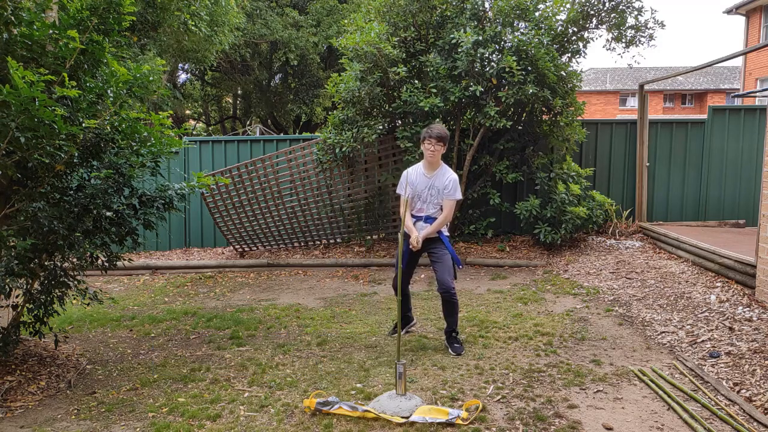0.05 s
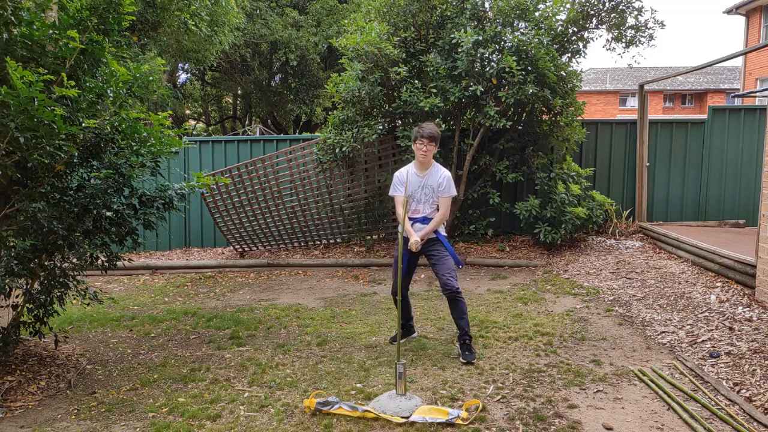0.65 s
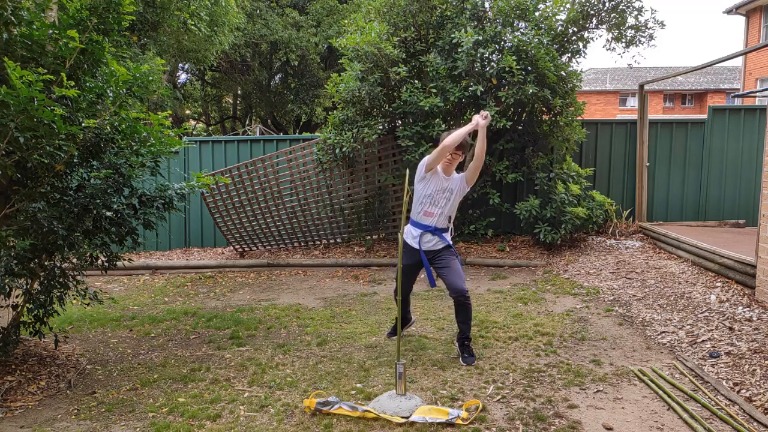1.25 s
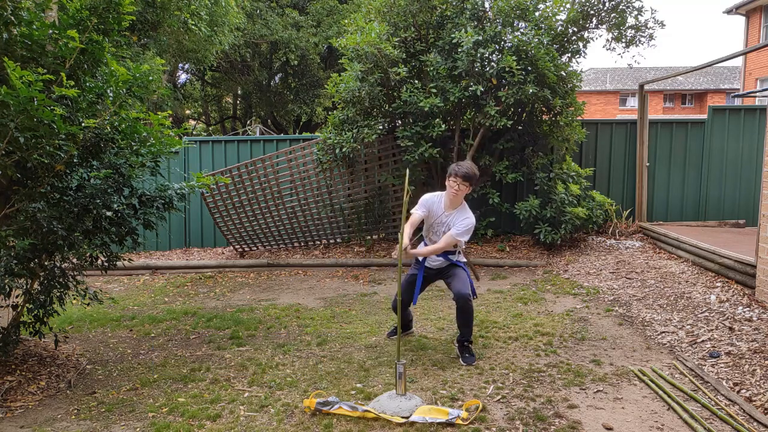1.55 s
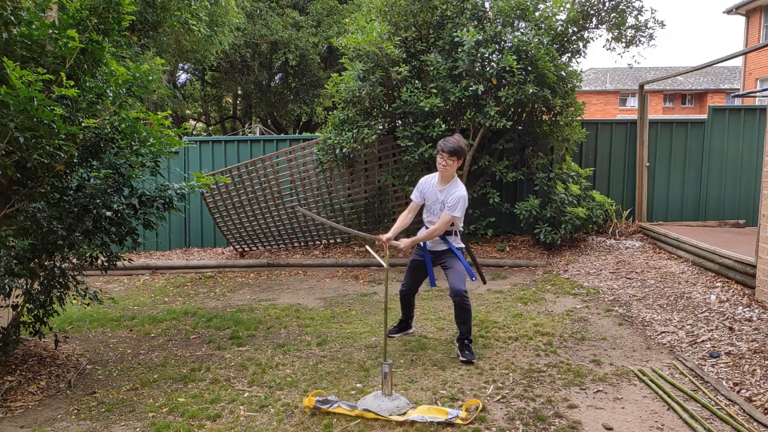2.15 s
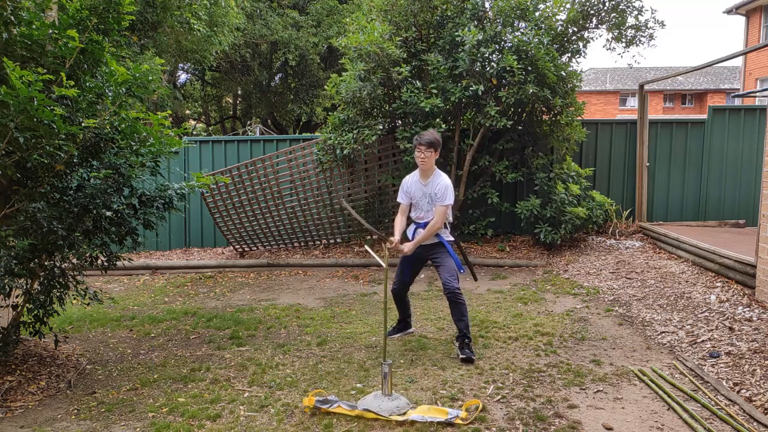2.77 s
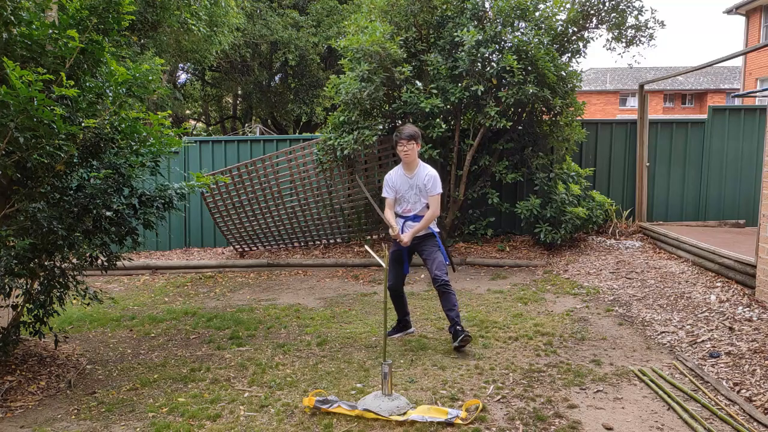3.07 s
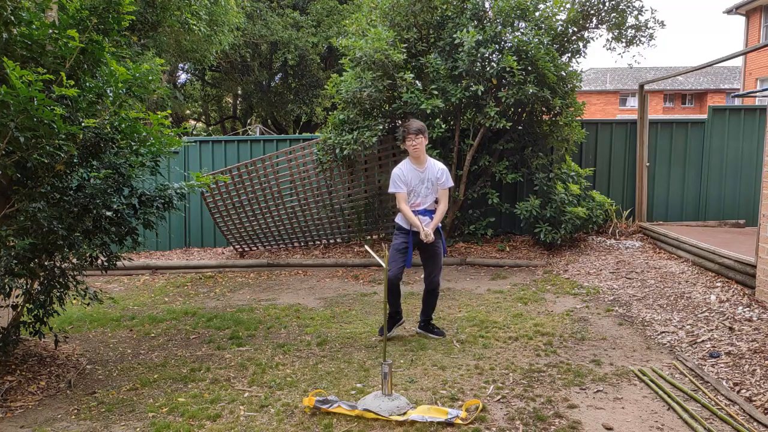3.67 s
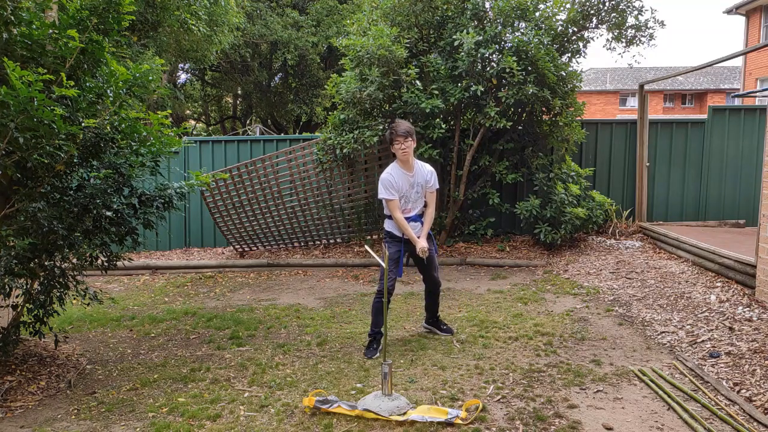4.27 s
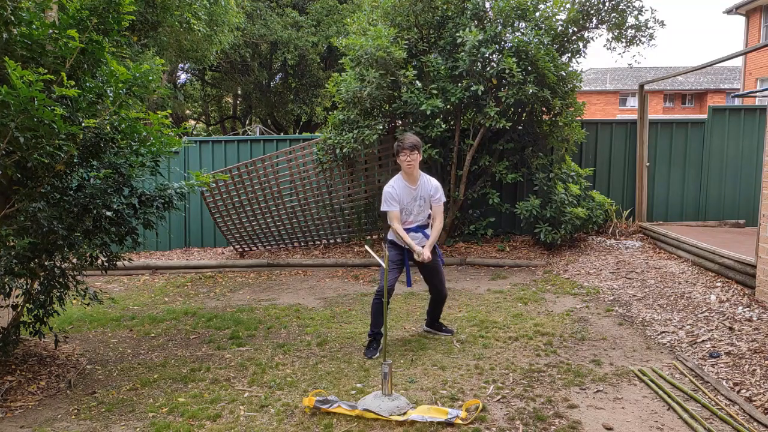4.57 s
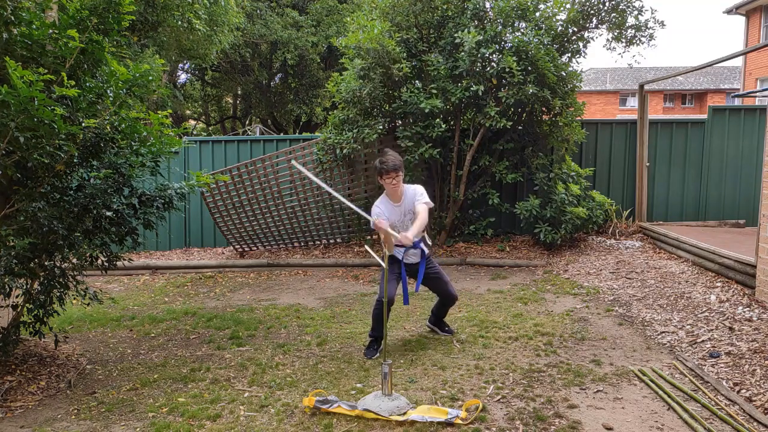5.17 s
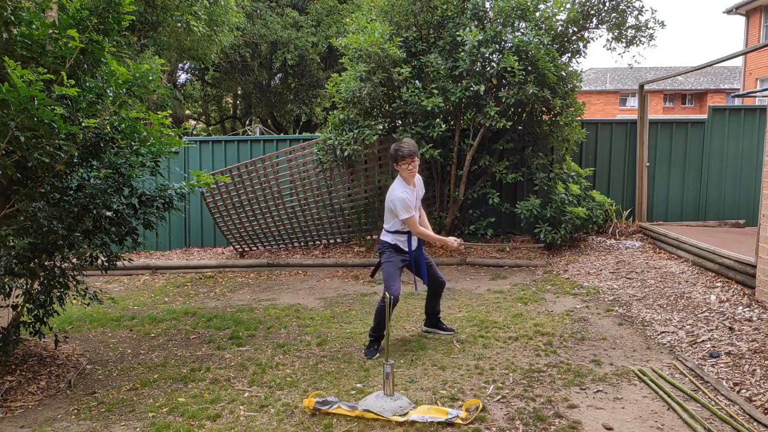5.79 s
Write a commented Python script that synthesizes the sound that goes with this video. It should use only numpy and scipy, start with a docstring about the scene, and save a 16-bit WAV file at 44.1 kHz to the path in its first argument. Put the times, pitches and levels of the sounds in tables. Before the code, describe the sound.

Close to the microphone in a fenced back yard, a sword gives a very brief whistle and bursts through a dry bamboo pole with a loud, splintering crack. The cut piece clatters down hollowly as the stand thuds softly on turf. A few seconds later comes a second cut and clatter, with splinters skittering through dead leaves. A small bird repeats a thin, high call over leaf hiss and distant town rumble.

```python
"""A fenced back yard, in stereo. Near the microphone a sword cuts twice through a dry bamboo pole:
the blade whistles, the fibres burst with a crack that overloads the recorder, and each cut piece
clatters down as a hollow tube while the stand rocks on the turf. Walls and fence answer. In the trees
a small bird repeats a thin high call and a farther one chirps once, over leaf hiss, soft swells of
air and the rumble of a distant town."""
import sys
import numpy as np
from scipy import signal
from scipy.fft import rfft, irfft, next_fast_len
from scipy.io import wavfile
from scipy.ndimage import uniform_filter1d, map_coordinates

SR = 44100
rng = np.random.default_rng(int(sys.argv[2]) if len(sys.argv) > 2 else 0)


def inscribe(sig):
    """Save sig as 16-bit PCM at rate SR to the path in sys.argv[1].

    A 1-D sig is mono; a 2-D sig holds one channel per row.
    Samples are clipped to [-1, 1] before scaling.
    """
    pcm = np.round(np.clip(np.atleast_2d(sig).T, -1, 1) * 32767)
    wavfile.write(sys.argv[1], SR, pcm.astype(np.int16))


N = 266135
TIME = np.arange(N) / SR
AGE = TIME[:SR * 3 // 4]  # seconds since the start of one short event


# The pole breaking, near the microphone: start_s, crack_db, tear_db, tear_s, jolt_db
BREAKS = [(1.6419, 0, -9.5, 0.02, -27), (1.674, -7, -24, 0.004, -28.5), (1.6824, -6, -14.5, 0.0035, -27.5),
          (5.3157, -2, -12, .023, -22)]
# Spectrum of the bursting fibres: frequency_hz, level_db
FIBRE_SPECTRUM = [(60, -23), (150, -30), (280, -15), (500, -3), (850, -11.5), (1300, -8.5), (2000, -4),
                  (3400, -2), (4600, -1), (6500, -4.5), (8500, 2), (10300, -9.5), (13000, -10.5),
                  (15500, -6)]

def cuts():
    """The edge cracks the hard skin, then fibres snap in a dense run while the pole is jolted."""
    crack_decay_s, splinter_decay_s, jolt_decay_s = 0.0047, 0.066, 0.024
    pole_spectrum = [(50, -1.5), (140, 1), (260, -3), (500, -8.5), (1000, -4), (4000, -62)]
    out = np.zeros((2, N))
    for start, crack_db, tear_db, tear_s, jolt_db in BREAKS:
        crack = amp(crack_db) * snaps(per_s=15000, spread_db=5.5) * np.exp(-AGE / crack_decay_s)
        run = np.exp(-(AGE / tear_s) ** 3)
        last_fibres = amp(-18.5) * np.exp(-AGE / splinter_decay_s)
        tear = amp(tear_db) * snaps(per_s=2500, spread_db=3.5) * (run + last_fibres)
        jolt = amp(jolt_db - 3) * rng.standard_normal(len(AGE)) * np.exp(-AGE / jolt_decay_s)
        add(out, start, yard(coloured(crack + tear, FIBRE_SPECTRUM), wet_db=1.5))
        add(out, start, yard(coloured(jolt, pole_spectrum), wet_db=-5.5))
    return out


# A twig underfoot, the cane giving way, a piece settling: start_s, level_db, pitch_hz, t60_s
WOODY_TICKS = [(.822, -37, 3000, .006), (1.679, -14.5, 1300, 0.014), (2.179, -36.5, 1800, .008),
               (5.3212, -9.5, 1150, 0.0054)]

def woody_ticks():
    """Short dry ticks and knocks: wood rings and stops within a few cycles."""
    out = np.zeros((2, N))
    for start, db, hz, t60 in WOODY_TICKS:
        add(out, start, yard(2 * damped_sine(hz, db, t60), wet_db=-6))
    return out


# The blade whistling just ahead of each cut: start_s, end_s, start_hz, end_hz, level_db
BLADE_SWINGS = [(1.598, 1.644, 1002, 1170, -38), (5.284, 5.318, 1240, 1063, -34)]

def blade():
    """Eddies shed by the blade give a short whistle that frays and swells as the blade speeds up."""
    attack_s, release_s = 0.0039, 0.005
    out = np.zeros((2, N))
    for start, end, start_hz, end_hz, db in BLADE_SWINGS:
        length = end - start
        progress = np.clip(AGE / length, 0, 1)
        fray = (0.03 + 0.17 * progress) * wobble(600)[:len(AGE)]
        pitch = (start_hz + (end_hz - start_hz) * progress) * (1 + fray)
        phase = 2 * np.pi * np.cumsum(pitch) / SR
        whistle = np.sin(phase) + amp(-15) * np.sin(2 * phase)
        swell = np.interp(AGE, [0, attack_s, length, length + release_s], [0, 1, 1.46, 0])
        add(out, start, yard(amp(db) * swell * whistle, wet_db=-12))
    return out


# Each falling piece's hits and their quick echoes off the walls: start_s, level_db, rattle_s
PIECE_CLATTER = [
    [(1.834, -15, 0.00099), (1.8356, -1.5, 0.0018), (1.8455, -8.5, 0.0015), (1.8525, -8, .0015)],
    [(5.4358, -16, 0.017), (5.446, -5.5, 0.0058), (5.4655, -12.5, 0.0049)],
]
# Resonances of each hollow piece: pitch_hz, level_db, t60_s
TUBE_MODES = [
    [(314, -14.5, 0.058), (2280, -6, 0.015), (2590, -1, 0.018), (3050, -8, .03), (3240, -0.5, .035),
     (3370, 3, 0.022)],
    [(818, 5, 0.023), (1170, -2, 0.059), (1520, -7, 0.032), (2300, -4, .035), (3140, -2, .04),
     (3580, -18, 0.026), (4000, -5, .03)],
]
# Spectrum of each piece's clatter: frequency_hz, level_db
CLATTER_SPECTRA = [
    [(100, -9.5), (450, -13), (850, -11), (1700, -3), (2400, -0.5), (3100, 1), (4400, -5.5), (7500, -3.5),
     (9000, -3.5), (10500, -11.5), (15500, -8.5)],
    [(100, -19), (300, -10.5), (540, -16.5), (850, -2.5), (2000, -1), (3400, 0), (4800, -0.5), (5800, -10),
     (9000, -2), (10500, -13.5), (15500, -13)],
]

def falling_pieces():
    """Each hit or echo in the clatter is a dry click and a brief rattle, with the ring of the tube."""
    click_db, rattle_db, ring_db = 16, -2, -14.5
    out = np.zeros((2, N))
    for clatter, modes, spectrum in zip(PIECE_CLATTER, TUBE_MODES, CLATTER_SPECTRA):
        for start, db, rattle_s in clatter:
            burst = amp(rattle_db) * snaps(per_s=12000, spread_db=5) * np.exp(-AGE / rattle_s)
            burst[0] = amp(click_db)
            # neighbouring modes move the tube's end in opposite directions
            ring = sum((-1) ** k * damped_sine(hz, mode_db + rng.normal(0, 1), t60)
                       for k, (hz, mode_db, t60) in enumerate(modes))
            clack = coloured(burst, spectrum) + amp(ring_db) * ring
            add(out, start, yard(amp(db) * clack, wet_db=-0.5))
    return out


# Splinters skittering on the ground after the second cut: start_s, level_db, decay_s
SPLINTER_SKITTERS = [(5.392, -22, 0.044), (5.695, -30.5, 0.024), (5.846, -39, 0.0051)]
# Spectrum of the dry leaf litter: frequency_hz, level_db
LITTER_SPECTRUM = [(300, -20), (1500, -9), (5000, -8), (8600, 1.5), (10500, -7), (15500, -5.5)]

def splinters():
    """Light splinters and twigs scratch through dead leaves."""
    out = np.zeros((2, N))
    for start, db, decay_s in SPLINTER_SKITTERS:
        scratch = snaps(per_s=3100, spread_db=8) * np.exp(-AGE / decay_s)
        add(out, start, yard(amp(db) * coloured(scratch, LITTER_SPECTRUM), wet_db=3))
    return out


# The weighted stand rocking, dead centre and without echo: start_s, level_db, pitch_hz
STAND_THUDS = [(1.665, -28, 143), (1.72, -30, 121), (1.895, -27.5, 112), (5.355, -24, 103)]

def stand():
    """The heavy foot drops back and sinks into soft turf."""
    attack_s = 0.0081
    sink = 1 - np.exp(-AGE / attack_s)
    out = np.zeros(N)
    for start, db, hz in STAND_THUDS:
        add(out, start, 2 * sink * damped_sine(hz, db, t60_s=0.13))
    return out


# A small bird off in the trees: start_s, length_s, middle_hz, glide_hz, level_db
BIRD_CALLS = [(-.1, 0.59, 9120, -170, -40), (1.13, 0.55, 8720, 403, -40.5),
              (2.22, 0.39, 8750, 218.5, -42.5), (3.238, 0.51, 8510, -1.5, -48),
              (4.222, .42, 8600, -190, -51), (5.221, 0.4, 8840, -490, -42.5)]

def birds():
    """Thin gliding whistles, each opened by a higher note, and one farther chirp; foliage scatters both."""
    waver_hz, fray_hz, bow_hz, flutter_db = 34.6, 78, 60.7, 2
    lead_s, lead_ratio, lead_db = 0.061, 1.17, -12
    foliage_db, foliage_t60_s = 4, 0.28
    unsteady_hz = waver_hz * wobble(25) + fray_hz * wobble(400)
    phase = lambda hz: 2 * np.pi * np.cumsum(hz + unsteady_hz) / SR
    song = np.zeros(N)
    for start, length, hz, glide_hz, db in BIRD_CALLS:
        bow = arch(start, length)  # pitch and level both bow upward mid-call
        progress = np.clip((TIME - start) / length, 0, 1)
        pitch = hz + glide_hz * (progress - 0.5) + bow_hz * (bow - 0.5)
        lead = amp(lead_db) * arch(start - lead_s / 2, lead_s) * np.sin(phase(lead_ratio * hz))
        song += amp(db) * (np.sqrt(bow) * np.sin(phase(pitch)) + lead)
    chirp_phase = phase(hz=2990)
    chirp = 0.5 * np.sin(chirp_phase) + np.sin(2 * chirp_phase)
    song += amp(-48.5) * arch(start_s=2.725, length_s=0.11) * chirp
    song *= amp(flutter_db * wobble(30.1))
    foliage = rng.standard_normal((2, len(AGE))) * amp(-60 * AGE / foliage_t60_s)
    foliage /= np.linalg.norm(foliage[0])
    return song + amp(foliage_db) * signal.fftconvolve(song[None], foliage, axes=1)[:, :N]


# The town, far beyond the fence: frequency_hz, level_db
TOWN_SPECTRUM = [(11, -29), (18, 1.5), (60, -1.5), (108, -10), (145, -3.5), (174, -11), (338, -12.5),
                 (532, -20.5), (577, -13.5), (627, -19), (2500, -31.5), (3250, -47), (5500, -120)]
# Traffic in the distance: frequency_hz, level_db
TRAFFIC_SPECTRUM = [(30, -17), (85, 2), (140, -13), (250, -4.5), (500, -18.5), (4000, -65)]

def town():
    """A steady distant rumble, over which far traffic swells once and recedes."""
    rumble = amp(-38.5) * rush(TOWN_SPECTRUM, patchy_db=0.74)
    traffic = amp(-39) * rush(TRAFFIC_SPECTRUM, patchy_db=1.5)
    return rumble + traffic * hump(peak_s=5.05, half_length_s=0.62)


# Leaf hiss all around the microphone: frequency_hz, level_db
LEAF_SPECTRUM = [(710, 2.5), (1200, -4.5), (2320, -3.5), (2890, -2), (3510, -2), (6100, -1), (7100, -2),
                 (8630, 1), (9210, 0), (10500, -13), (14800, -13.5), (16000, -20)]

def leaves():
    """The breeze in the leaves holds, then drops away to a calm."""
    breeze_db, calm_db, hold_s, release_s = -40, -43, 1.95, 0.69
    breeze = np.exp(-np.maximum(TIME - hold_s, 0) / release_s)
    return amp(calm_db + (breeze_db - calm_db) * breeze) * rush(LEAF_SPECTRUM, patchy_db=1)


# Deep air noise, the same in both channels: peak_s, half_length_s, level_db
AIR_SWELLS = [(2.97, 0.23, -35.5), (4.25, 0.29, -46), (5.604, 0.22, -36)]

def air():
    """A low band of air noise rises and falls in soft swells."""
    centre_hz = 34.5
    band = [(centre_hz / 4, -30), (centre_hz, 0), (centre_hz * 2, -20), (centre_hz * 20, -80)]
    noise = unit(filtered(rng.standard_normal(N), lambda hz: amp(along(band, hz))))
    return noise * sum(amp(db) * hump(peak, half_length) for peak, half_length, db in AIR_SWELLS)


# How alike town and leaves are on the microphone's two sides: frequency_hz, correlation
STEREO_LIKENESS = [(60, 0.82), (150, 0.94), (380, 0.81), (950, -0.12), (2380, -0.11), (5980, -0.00032),
                   (15000, 0.011)]

def rush(spectrum, patchy_db):
    """Diffuse stereo noise of rms 1, its level uneven in patches of time and frequency."""
    bins = signal.stft(rng.standard_normal((2, N)), nperseg=512)[2]
    patches = uniform_filter1d(rng.standard_normal(bins.shape[1:]), size=5, axis=0)
    patches = uniform_filter1d(patches, size=14, axis=1)
    pair = signal.istft(bins * amp(patchy_db * unit(patches)), nperseg=512)[1][:, :N]
    width = lambda hz: np.arccos(np.clip(along(STEREO_LIKENESS, hz), -1, 1)) / 2
    response = lambda hz: amp(along(spectrum, hz)) * [np.cos(width(hz)), np.sin(width(hz))]
    mid, side = filtered(pair, response)
    return unit(np.array([mid + side, mid - side]))


# Echoes of the nearest walls at the microphone: delay_s, level_db, left_lag_s
WALL_ECHOES = [(0.0098, -10.5, -0.0043), (0.017, -4, .0003), (.0227, -9, -.0003)]
# Reverberation of the yard: frequency_hz, t60_s
YARD_DECAY = [(150, 0.39), (900, 0.36), (3000, .48), (8000, 0.41), (15000, 0.28)]

def yard(x, wet_db):
    """Direct sound, scatter off the ground, then wall echoes and the dying wash of fence and trees."""
    ground_db, ground_decay_s = -9, 0.00075
    gap_s, early_db, early_t60_s = 0.0098, 3, 0.16
    hz, t, bins = signal.stft(rng.standard_normal((2, len(AGE))), SR, nperseg=256)
    fade = amp(-60 * t / along(YARD_DECAY, hz)[:, None]) + amp(early_db - 60 * t / early_t60_s)
    wash = signal.istft(bins * fade, SR, nperseg=256)[1][:, :len(AGE)] * (AGE > gap_s)
    ground = rng.standard_normal(wash.shape) * np.exp(-AGE / ground_decay_s)
    response = amp(wet_db) * wash / np.linalg.norm(wash[0])
    response += amp(ground_db) * ground / np.linalg.norm(ground[0])
    response[:, 0] += 1  # direct sound
    for delay, db, left_lag in WALL_ECHOES:
        response[0, round((delay + left_lag) * SR)] += amp(db)
        response[1, round(delay * SR)] += amp(db)
    return signal.fftconvolve(x[None], response, axes=1)[:, :len(AGE)]


def snaps(per_s, spread_db):
    """Tiny fractures at random moments and of random sizes, rms 1."""
    sizes = amp(spread_db * np.clip(rng.standard_normal(len(AGE)), -2, 2))
    signs = rng.choice([-1, 1], len(AGE))
    return unit(sizes * signs * (rng.random(len(AGE)) < per_s / SR))


def damped_sine(hz, db, t60_s):
    """One struck resonance dying away."""
    return amp(db - 60 * AGE / t60_s) * np.sin(2 * np.pi * hz * AGE)


def arch(start_s, length_s):
    """Half a sine over a note, zero outside it."""
    return np.abs(np.sin(np.pi * np.clip((TIME - start_s) / length_s, 0, 1)))


def hump(peak_s, half_length_s):
    """A bell-shaped rise and fall."""
    return np.exp(-((TIME - peak_s) / half_length_s) ** 2)


def wobble(per_s):
    """A smooth random curve with per_s knots a second."""
    return map_coordinates(rng.standard_normal(int(N * per_s / SR) + 4), [TIME * per_s])


def amp(db):
    """Decibels to gain."""
    return 10 ** (np.asarray(db) / 20)


def unit(x):
    """Scale to rms 1."""
    return x / np.sqrt(np.mean(x ** 2) + 1e-20)


def along(points, hz):
    """Read (frequency_hz, value) points on a log frequency axis."""
    frequencies, values = np.transpose(points)
    return np.interp(np.log(hz + 1), np.log(frequencies + 1), values)


def filtered(x, response):
    """x through a zero-phase filter of gain response(hz)."""
    size = next_fast_len(N + SR // 2)
    return irfft(rfft(x, size) * response(np.fft.rfftfreq(size, 1 / SR)), size)[..., :N]


def coloured(x, spectrum, size=2048):
    """x through a causal filter of energy 1, shaped by (frequency_hz, level_db) points."""
    gain = amp(along(spectrum, np.fft.rfftfreq(size, 1 / SR)))
    cepstrum = irfft(np.log(gain))
    cepstrum[1:size // 2] *= 2  # fold onto positive time for minimum phase
    cepstrum[size // 2 + 1:] = 0
    pulse = irfft(np.exp(rfft(cepstrum)))
    return signal.fftconvolve(x, pulse / np.linalg.norm(pulse))[:len(x)]


def add(track, start_s, x):
    """Mix x into the track from start_s."""
    part = track[..., round(start_s * SR):][..., :x.shape[-1]]
    part += x[..., :part.shape[-1]]


def scene():
    """Everything that reaches the microphone, from the pole out to the distance."""
    near = cuts() + woody_ticks() + blade() + falling_pieces() + splinters() + stand()
    return near + birds() + town() + leaves() + air()


def record(dry):
    """The microphone's left side is the brighter; the cracks overload the band-limited recorder."""
    top_hz = 16000
    tilt_db = lambda hz: along([(9000, 0), (11000, 2.5), (15000, 2)], hz)
    band = lambda hz: np.interp(hz, [top_hz - 150, top_hz + 150], [1, 0])
    heard = filtered(dry, lambda hz: band(hz) * amp([tilt_db(hz), -tilt_db(hz)]))
    return filtered(np.clip(heard, -1, 1), band)


dry = scene()
out = record(dry)
inscribe(out)
```